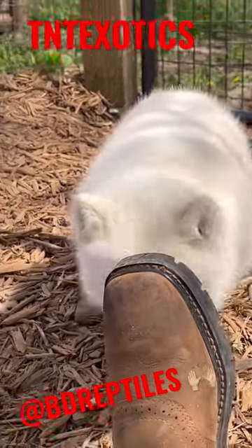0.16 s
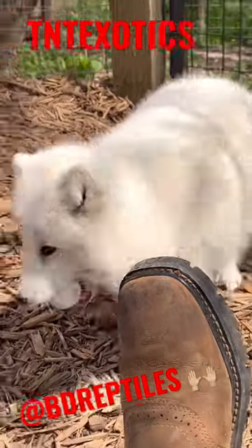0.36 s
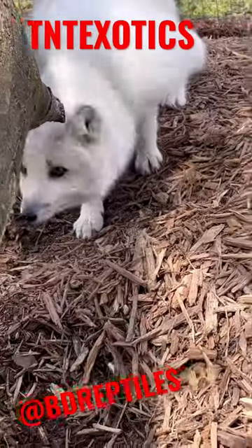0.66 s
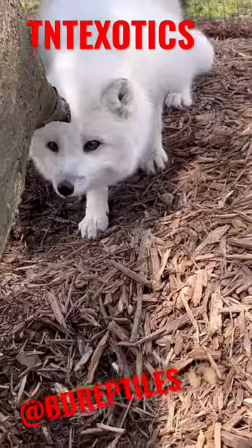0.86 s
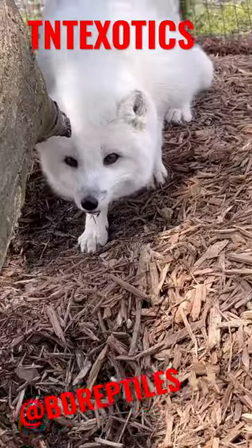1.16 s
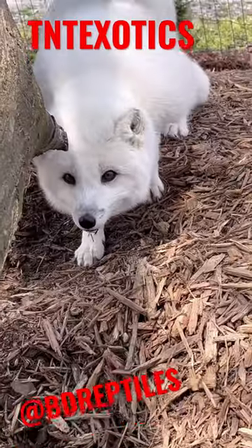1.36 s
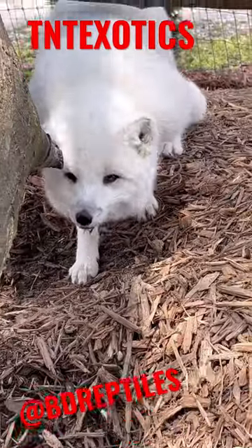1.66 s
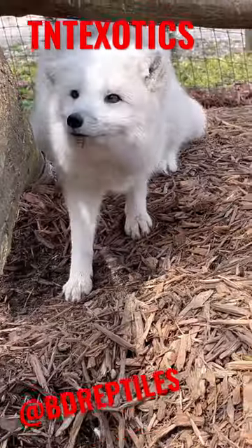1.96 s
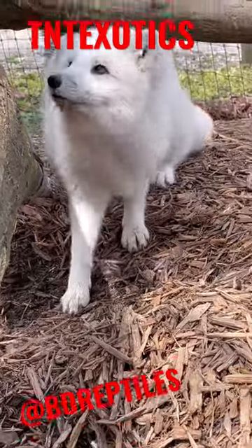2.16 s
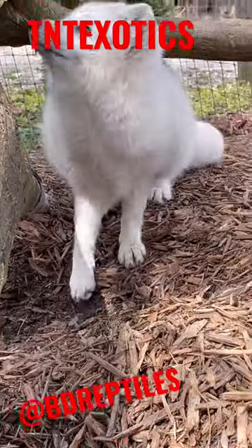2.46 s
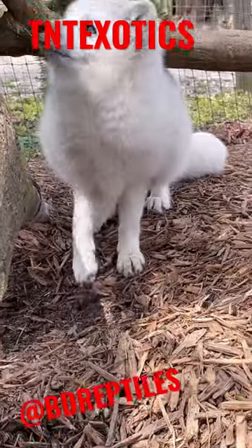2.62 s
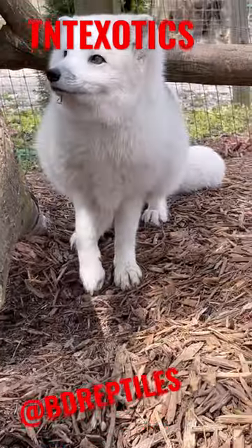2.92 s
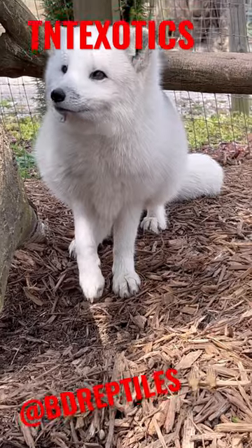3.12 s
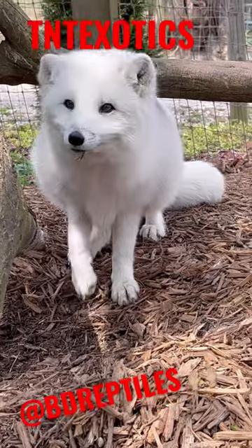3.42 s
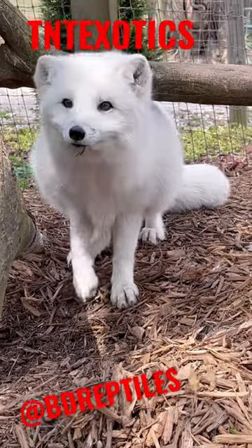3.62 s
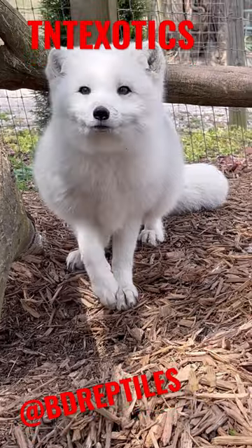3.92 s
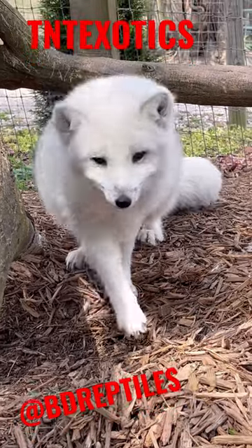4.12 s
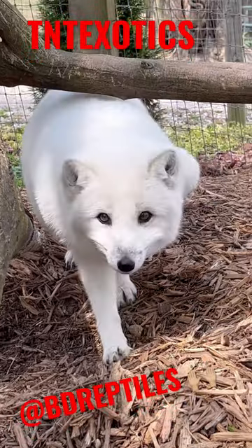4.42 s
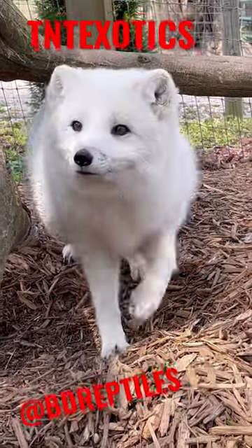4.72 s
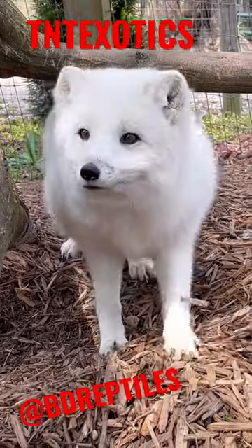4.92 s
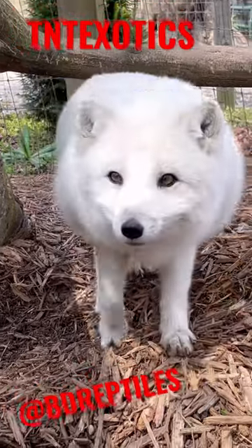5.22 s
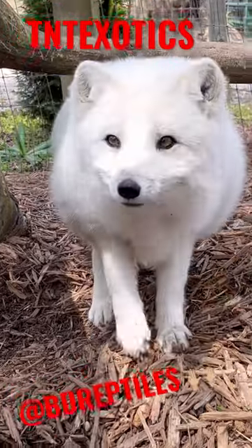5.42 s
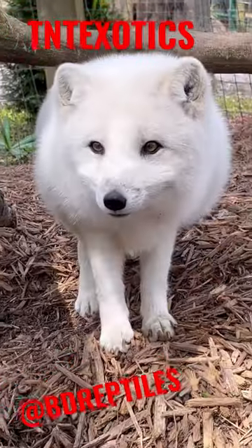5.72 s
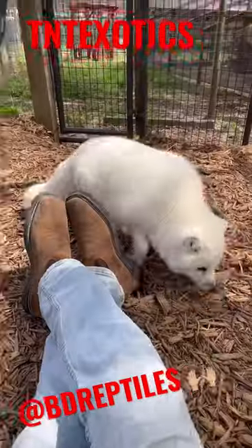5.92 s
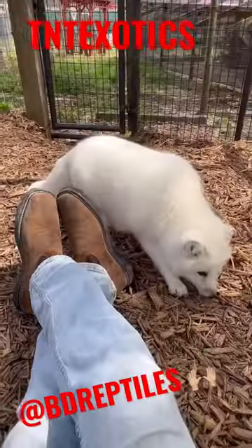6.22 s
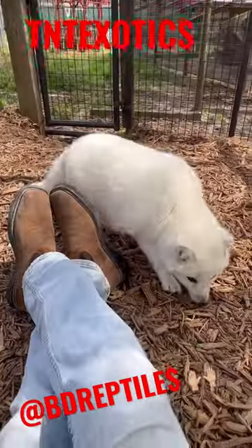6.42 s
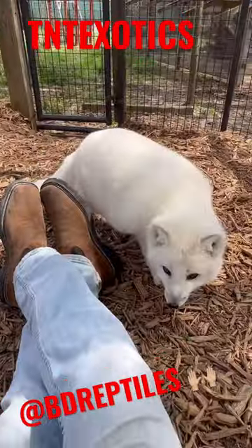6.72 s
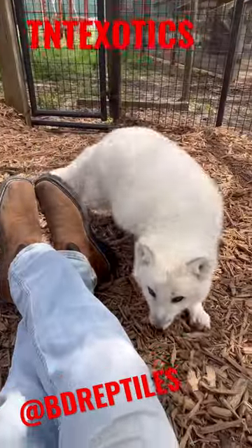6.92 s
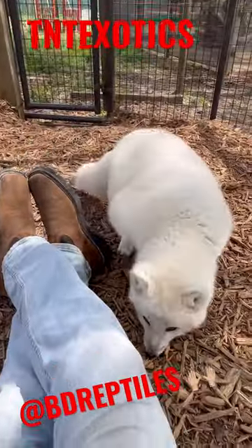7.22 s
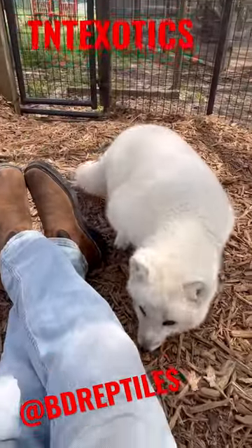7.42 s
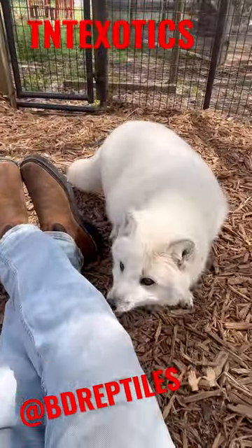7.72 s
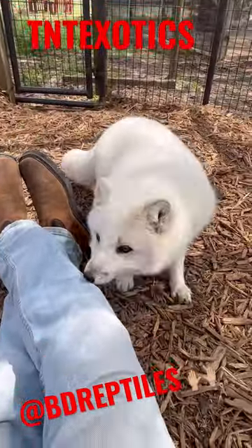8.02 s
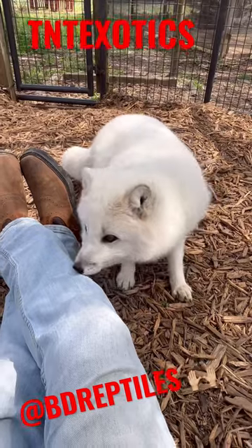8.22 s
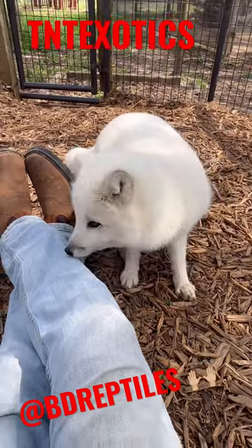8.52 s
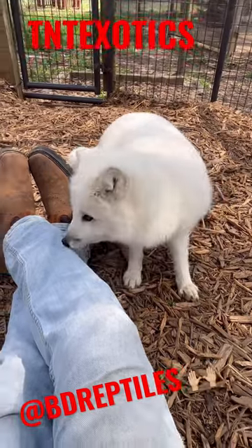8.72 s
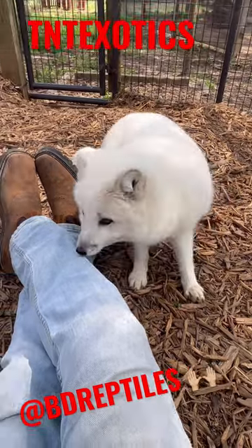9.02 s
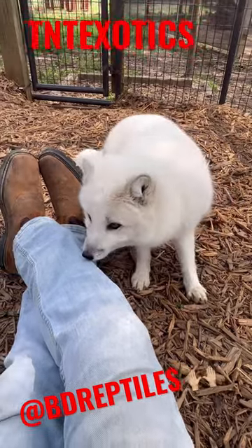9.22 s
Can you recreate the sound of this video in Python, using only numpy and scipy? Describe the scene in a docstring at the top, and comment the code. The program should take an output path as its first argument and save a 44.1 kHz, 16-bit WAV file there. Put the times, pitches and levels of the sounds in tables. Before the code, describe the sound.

A small plane hums very low beneath busy birdsong: zigzag sparrow chirps, clear whistles, quick chattering, thin high notes and a buzzing trill. Wind puffs thump the handheld microphone, and light crisp rustles come from paws on chips. After a sudden join at about six seconds, a fuller droning roar takes over, swelling unevenly to the end, with only occasional bird notes above it.

```python
"""An outdoor animal pen strewn with wood chips, in three joined passages: a small propeller plane drones closer.
The plane is a harmonic series of blade tones, joined in the last passage by an exhaust tone and chopped roar.
Sparrows, whistlers and high thin callers are gliding near-sines; a blackbird trills as a pulsed, resonant buzz.
All birds scatter among trees and fences. Shaped noise makes far traffic and leaves, wind on the microphone,
hiss and paws on chips; damped modes ring as a few hollow clicks, and a tick marks each join."""
import sys
import numpy as np
from scipy import signal
from scipy.fft import rfft, irfft, next_fast_len
from scipy.io import wavfile
from scipy.ndimage import uniform_filter1d

SR = 44100
rng = np.random.default_rng(int(sys.argv[2]) if len(sys.argv) > 2 else 0)


def to_wav(s):
    """Save 16-bit WAV."""
    ch = np.atleast_2d(s).T  # columns
    pcm = np.round(np.clip(ch, -1, 1) * 32767)  # PCM
    wavfile.write(sys.argv[1], SR, pcm.astype(np.int16))


N = 412776

# the three joined passages: start_s, end_s
PASSAGES = [(0, .553), (.553, 5.864), (5.864, 9.36)]
# when one sparrow repeats its zigzag chirp: start_s, level_db (before the group's trim), pitch_ratio
CHIRPS = [(0.637, -55.5, 1.01), (1.235, -51.5, 1.02), (2.16, -51.5, 1.02), (3.287, -55, 1.03)]
TREBLE_FROM_HZ, TREBLE_TO_HZ = 5600, 14300   # filter edges shared by the hissy sounds


def amp(db):
    """Decibels to amplitude ratio: 20 dB is a factor of ten."""
    return 10 ** (np.asarray(db) / 20)


def rms_one(x):
    """Normalise the mean power, so that rms is 1."""
    return x / np.sqrt(np.mean(x ** 2) + 1e-20)


def in_time(rows):
    """Linear interpolation: the columns of a curve table at every sample."""
    s, *columns = np.transpose(rows)
    return np.array([np.interp(np.arange(N) / SR, s, c) for c in columns])


def sounding(rows, fade):
    """Gating: 1 from the first row's time to the last, with linear edges of fade seconds."""
    t = np.arange(N) / SR
    return np.clip(np.minimum(t - rows[0][0], rows[-1][0] - t) / fade, 0, 1)


def by_passage(tables):
    """Piecewise interpolation: curves that may jump where two passages join."""
    t = np.arange(N) / SR
    return sum(in_time(rows) * ((t >= a) & (t < b)) for rows, (a, b) in zip(tables, PASSAGES))


def at_hz(points, hz):
    """Read a spectrum table on a logarithmic frequency axis."""
    p = np.array(points)
    return np.interp(np.log(hz), np.log(p[:, 0]), p[:, 1])


def drift(rate):
    """Low-passed noise: a random wander of rms 1, slower than about rate in Hz."""
    # computed at one sixteenth of the sample rate, past the filter's settling
    r = np.exp(-32 * np.pi * rate / SR)
    white = rng.standard_normal(N // 16 + 4002)
    slow = rms_one(signal.lfilter([1], [1, -2 * r, r * r], white)[4000:])
    return np.interp(np.arange(N) / 16, np.arange(len(slow)), slow)


def resonate(x, hz, width):
    """Two-pole resonance: bandwidth sets the damping; gain is about 1 on top."""
    r = np.exp(-np.pi * width / SR)
    zeros = np.array([1, 0, -1]) * (1 - r * r) / 2
    return signal.lfilter(zeros, [1, -2 * r * np.cos(2 * np.pi * hz / SR), r * r], x)


def steep(x, hz, kind):
    """Elliptic filtering: a steep low- or high-pass."""
    return signal.sosfilt(signal.ellip(8, 1, 45, hz, kind, fs=SR, output="sos"), x)


def impulses(events):
    """Unit-sample excitation: one sample at each event, of its peak height."""
    x = np.full(N, 1e-18)
    for s, db in events:
        x[round(s * SR)] = amp(db)
    return x


def banded_noise(colour, patchy_db, above_hz=0, lift_db=0):
    """Partly coherent stereo noise in third-octaves; bands centred over above_hz also follow lift_db."""
    # left-right likeness: frequency_hz, correlation
    likeness = [(40, 0.99), (110, 0.96), (210, 1), (390, 0.85), (740, 0.36), (1380, 0.53), (2580, 0.39),
                (4820, 0.91), (6000, 1), (9000, 0.8)]
    # the ports differ in colour: frequency_hz, left_minus_right_db
    lean = [(60, 0), (98, 2), (160, -3), (260, 1.5), (420, 1), (690, -4), (1120, -0.5), (1820, 4.5),
            (2960, 0), (4820, 0)]
    edges = colour[0][0] * 2 ** np.arange(0, np.log2(colour[-1][0] / colour[0][0]) + .01, 1 / 3)
    out, power, white = 0, 0, rng.standard_normal((2, 2, N))
    for k, (low, high) in enumerate(zip(edges, edges[1:])):
        band = signal.butter(3, [low, high], "band", fs=SR, output="sos")
        mid, side = signal.sosfilt(band, white[k % 2])   # neighbouring bands are independent
        hz = np.sqrt(low * high)
        alike = np.clip(at_hz(likeness, hz), -1, 1)
        level_db = at_hz(colour, hz)
        gain = amp(level_db + patchy_db * drift(10.0) + lift_db * (hz > above_hz))
        gain = gain * amp(at_hz(lean, hz) * np.array([[.5], [-.5]]))
        power += amp(2 * level_db) * (high - low) / SR * 2
        stereo = np.sqrt(1 + alike) * mid + np.sqrt(1 - alike) * side * [[1], [-1]]
        out = out + gain * stereo / np.sqrt(2)
    return out / np.sqrt(power)


def notes(tables, rough, overtones_db=(), flutter_db=2):
    """Frequency modulation: near-sine notes whose pitch and level are shaken fast at random."""
    out, shake, flutter = np.zeros(N), drift(200), drift(65)
    for rows in tables:
        s, hz, db = np.transpose(rows)
        span = np.arange(int(s[0] * SR), min(int(s[-1] * SR), N))
        t = span / SR
        pitch_hz = np.interp(t, s, hz) * (1 + rough * shake[span])
        phase = 2 * np.pi * np.cumsum(pitch_hz) / SR
        wave = np.sin(phase) + sum(amp(o) * np.sin(k * phase) for k, o in enumerate(overtones_db, start=2))
        edges = np.clip(np.minimum(t - s[0], s[-1] - t) / .006, 0, 1)
        out[span] += np.sqrt(2) * wave * amp(np.interp(t, s, db) + flutter_db * flutter[span]) * edges
    return out


def shaped(events):
    """Envelope shaping: each note swells, holds and dies away while its pitch turns once."""
    onset, turn, release = .24, .4, .26   # shares of the note's length
    shares = np.sort([0, onset, turn, 1 - release, 1])
    envelope_db = np.interp(shares, [0, onset, 1 - release, 1], [-2, 0, .5, -10.5])
    curves = []
    for s, length, *hz, db in events:
        pitch_hz = np.interp(shares, [0, turn, 1], hz)
        curves.append(np.transpose([s + length * shares, pitch_hz, db + envelope_db]))
    return curves


def pips(events, parts):
    """Windowed chirps: each event sounds the same few brief glides, swelling and fading smoothly."""
    out = np.zeros(N)
    for delay, from_hz, to_hz, length, part_db in parts:
        size = int(length * SR)
        phase = 2 * np.pi * np.cumsum(np.linspace(from_hz, to_hz, size)) / SR
        glide = np.hanning(size) * np.sin(phase)
        for s, db in events:
            start = round((s + delay) * SR)
            out[start:start + size] += amp(db + part_db) * glide
    return out


def throat(x, group):
    """Formant filtering: parallel resonances, each applied twice for steep flanks; rms 1."""
    return rms_one(sum(amp(db) * resonate(resonate(x, hz, w), hz, w) / np.sqrt(w) for hz, w, db in group))


def among_trees(x, wet_db, t60):
    """Diffuse scattering from trunks and fences: decaying, partly coherent noise, ending with the passage."""
    t = np.arange(int(t60 * SR)) / SR
    mid, side = rng.standard_normal((2, len(t))) * amp(-60 * t / t60) * np.minimum(t / .01, 1)
    alike = .75   # left-right correlation
    scatter = np.sqrt(1 + alike) * mid + np.sqrt(1 - alike) * side * [[1], [-1]]
    scatter /= np.sqrt(np.sum(scatter ** 2, axis=1, keepdims=True))
    out = np.array([x, x])
    for a, b in PASSAGES:
        part = slice(round(a * SR), round(b * SR))
        wet = signal.fftconvolve(x[None, part], scatter, axes=1)[:, :len(x[part])]
        out[:, part] += amp(wet_db) * wet
    return out


def microphone_hiss():
    """Self-noise: faint white noise confined to the treble."""
    treble = steep(rng.standard_normal(N), TREBLE_FROM_HZ, "high")
    return amp(-91) * steep(treble, TREBLE_TO_HZ, "low")


def far_air():
    """Superposed distant sources: far traffic and leaves as coloured noise; its airy treble rises and falls."""
    # one table a passage: time_s, level_db (before the trim below)
    air_levels = [
        [(0.0, -57), (0.354, -56), (0.553, -55.5)],
        [(0.55, -56), (0.88, -56.5), (1.29, -58.5), (1.78, -56), (2.0, -57.5), (4.01, -55), (4.95, -55.5),
         (5.73, -53), (5.86, -53.5)],
        [(5.86, -47.5), (6.06, -47.5), (6.3, -51), (6.99, -52.5), (7.71, -56), (8.06, -62.5), (9.36, -51.5)],
    ]
    # frequency_hz, density_db_per_hz
    air_colour = [(200, -8), (320, -10.5), (620, -13.5), (1200, -16.5), (1840, -24.5), (2590, -29.5),
                  (3590, -28.5), (4470, -36), (5450, -34), (6000, -50), (6500, -46), (8100, -60)]
    # level of the treble against the colour: time_s, lift_db
    air_treble = [(0, 12), (.55, 0.5), (.9, 1.5), (1.45, 5), (1.6, -4.5), (1.9, 1.5), (2.35, 2.5),
                  (2.6, -6.5), (2.9, -8.5), (3.2, 3.5), (3.9, 1.5), (4.3, 0), (4.55, -14.5), (4.8, 8),
                  (5.86, 1), (9.36, -6.5)]
    air = banded_noise(air_colour, patchy_db=2.0, above_hz=2400, lift_db=in_time(air_treble)[0])
    return amp(by_passage(air_levels)[0] - 1.5) * air


def join_ticks():
    """Step response: a small jump in the waveform, dying at once, where two passages meet."""
    # time_s, peak_db (before the trim below)
    ticks = [(0.554, -33.5), (5.8642, -38)]
    return amp(2.5) * signal.lfilter([1], [1, -.92], impulses(ticks))


def wind():
    """Turbulent pressure on the microphone ports: rumble and puffs, a wandering calm that gusts lift."""
    # frequency_hz, density_db_per_hz
    wind_colour = [(25, -18), (50, 6), (68, 6.5), (105, -3.5), (130, -1.5), (190, -12.5), (240, -17.5),
                   (320, -30.5)]
    # wind between gusts, one row a passage: rumble_db, puff_db (before the trims below)
    calm_levels = [(-51.5, -53), (-55.5, -55.5), (-53.5, -49)]
    # centre_s, db_over_calm
    gusts = [(.02, -1), (.3, 2), (.47, 0.5), (1.06, 11.5), (1.95, 12), (2.23, 10.5), (2.5, 3), (2.7, 4.5),
             (2.97, 4.5), (3.41, 7), (3.75, 2.5), (4.1, 5), (5.88, 6), (6.39, -1.5), (6.9, -1.5), (7.09, 2),
             (8.81, 3), (9.12, 7.5)]
    gust_s, puff_share, wander_db = .29, .62, 1   # full length of a gust; share of it in the puffs
    t = np.arange(N) / SR
    gust_db = sum(db * np.cos(np.pi * np.clip((t - s) / gust_s, -.5, .5)) ** 2 for s, db in gusts)
    rumble_db, puff_db = by_passage([[(a, *calm), (b, *calm)] for calm, (a, b) in zip(calm_levels, PASSAGES)])
    rumble_db = rumble_db + gust_db + wander_db * drift(1.5)
    puff_db = puff_db + puff_share * gust_db + wander_db * drift(5.0)
    noise = banded_noise(wind_colour, patchy_db=1, above_hz=75, lift_db=puff_db - rumble_db + 4.5)
    return amp(rumble_db + 6.0) * noise


def rustle():
    """Granular friction: paws free short showers of bright grains over faint, duller rustling that comes and goes."""
    # paws on chips: start_s, length_s, level_db
    showers = [(0.198, 0.076, -75), (.3, .1, -77), (0.406, 0.1, -79), (4.172, 0.022, -76),
               (4.52, 0.027, -75), (4.614, 0.086, -69.5), (4.804, 0.11, -68), (5.1, 0.067, -72),
               (5.417, 0.087, -70), (5.495, 0.045, -72.5), (5.71, .06, -70), (6.067, 0.091, -64),
               (6.363, 0.0083, -69), (6.367, .012, -61), (6.38, 0.026, -67), (6.594, 0.054, -72.5),
               (6.877, 0.057, -67.5), (7.19, 0.049, -62), (7.79, 0.048, -68.5)]
    # frequency_hz, width_hz, gain_db
    rustle_colour = [(6900, 7900, -1.5), (11400, 15000, 2.5), (15000, 3700, -5.5)]
    # faint, duller rustling: time_s, level_db (before the trim below)
    scuffle = [(0.0, -101), (0.78, -86), (1.01, -100), (2.03, -102), (2.32, -96.5), (2.74, -101),
               (4.51, -101), (4.77, -96), (5.01, -92), (5.66, -92.5), (5.94, -101), (6.31, -90.5),
               (6.88, -100), (7.06, -91.5), (7.59, -99), (7.66, -93), (8.34, -101), (9.36, -101)]
    t = np.arange(N) / SR
    corners = np.array([0, .12, .5, 1])   # start, end of attack, end of hold, end: shares of the length
    shower = sum(amp(db) * np.interp(t, s + length * corners, [0, 1, 1, 0]) for s, length, db in showers)
    grains = rng.standard_normal(N) * (rng.random(N) < .15)   # sparse
    grains = grains + .5 * rng.standard_normal(N)   # dense, alike in both channels
    grains = grains + .19 * rng.standard_normal((2, N))   # each channel's own
    grains = sum(amp(db) * resonate(grains, hz, width) for hz, width, db in rustle_colour)
    grains = rms_one(steep(grains, TREBLE_FROM_HZ, "high"))
    scuffle_gain = amp(in_time(scuffle)[0] + 9.5 + 4.0 * drift(7))
    return shower * grains + scuffle_gain * steep(grains, TREBLE_TO_HZ, "low")


def clicks():
    """Modal synthesis: a brief contact sets the damped modes of a small hollow body ringing."""
    # contacts: time_s, peak_db (before the modes' gains)
    contacts = [(5.0518, -31.5), (5.0695, -41), (5.0752, -40), (5.0768, -27), (5.7475, -36.5)]
    # frequency_hz, gain_db, t60_s
    modes = [(1610, -7, 0.008), (1280, 8, 0.0037), (920, -7, 0.0045), (564, -4, 0.033)]
    touch = np.hanning(int(.0006 * SR))   # contact lasts 0.6 ms
    taps, out = np.convolve(impulses(contacts), touch / touch.sum())[:N], 0
    for hz, db, t60 in modes:
        r, w = amp(-60 / (t60 * SR)), 2 * np.pi * hz / SR
        out = out + amp(db) * signal.lfilter([0, np.sin(w)], [1, -2 * r * np.cos(w), r * r], taps)
    return out * amp([[-1.5], [1.5]])   # louder on the right


def blackbird():
    """Amplitude modulation: a throbbing buzz of about 100 pulses a second excites two groups of resonances."""
    # start_s, length_s, low_band_db, high_band_db, high_band_loss_db_per_s
    trills = [(0, 0.18, -54.5, -56.5, 36), (4.87, 0.71, -57.5, -89, 18), (5.86, 0.34, -55, -55, 54.5)]
    # throat resonances of the low band, one table a trill: frequency_hz, width_hz, gain_db
    low_groups = [
        [(2890, 230, 2), (3220, 350, -1.5), (3930, 500, -6.5), (4520, 530, -8)],
        [(2975, 250, 7), (3430, 340, 2.5), (4050, 680, -1.5), (4930, 380, -3.5)],
        [(2856, 140, 2.5), (3340, 170, 7.5), (3750, 400, -8)],
    ]
    # throat resonances of the high band: frequency_hz, width_hz, gain_db
    high_group = [(5280, 280, 0), (4800, 400, -9)]
    t = np.arange(N) / SR
    pulses = 1 + .95 * np.sin(2 * np.pi * 100 * t + 2.1 * drift(1.44))
    throb = 1 + .13 * np.sin(2 * np.pi * 32 * t)
    buzz, out = pulses * throb * rng.standard_normal(N), 0
    high = throat(buzz, high_group)
    for (s, length, low_db, high_db, loss_db), group in zip(trills, low_groups):
        release_db = -23 * np.clip((t - s - length) / .036 + 1, 0, 1)   # over the last 36 ms
        high_gain = amp(high_db - loss_db * np.clip(t - s, 0, length))
        both = amp(low_db) * throat(buzz, group) + high_gain * high
        out = out + sounding([[s], [s + length]], .0049) * amp(release_db) * both
    return steep(out, 6600, "low")


def far_birds():
    """Frequency-modulated tones: far calls, hoarse calls, chirps that fall twice, and high thin notes."""
    # three tables of notes: start_s, length_s, pitch_start_hz, pitch_turn_hz, pitch_end_hz,
    # level_db (before the group's trim)
    far_calls = [(.65, 0.49, 2160, 2140, 2036, -72), (1.87, 0.075, 5270, 4840, 5100, -70),
                 (2.085, 0.094, 2480, 3540, 4030, -65), (3.39, 0.11, 5600, 5040, 5200, -78),
                 (7.55, 0.2, 5800, 5540, 5650, -71.5), (7.97, 0.11, 5140, 5200, 5050, -70)]
    hoarse_calls = [(1.81, 0.065, 2940, 3500, 4140, -64.5), (2.99, 0.068, 4370, 4630, 4680, -67.5),
                    (3.02, 0.082, 3740, 3720, 3430, -62.5), (6.495, 0.25, 6250, 5260, 4880, -62.5),
                    (6.52, 0.093, 4500, 4230, 4250, -70), (6.7, .2, 4750, 5033, 4650, -75)]
    thin_notes = [(.36, .19, 6930, 7000, 6720, -84.5), (1.145, 0.12, 6670, 6830, 6850, -73),
                  (1.34, 0.045, 8050, 7730, 7700, -79), (1.68, 0.16, 7840, 7800, 7900, -82),
                  (1.89, 0.021, 6694, 6806, 6700, -75), (2.42, 0.32, 7700, 7840, 7880, -83),
                  (2.8, 0.33, 7200, 6800, 6700, -93), (3.4, 0.16, 7430, 7980, 7550, -85),
                  (4.16, 0.33, 8480, 7800, 7980, -81), (4.4, 0.077, 8260, 8470, 8100, -74.5),
                  (4.98, 0.13, 8100, 8800, 9140, -76.5), (5.33, 0.041, 8260, 8200, 8160, -84),
                  (5.585, 0.042, 8400, 8260, 7900, -76), (5.65, 0.15, 8150, 8660, 8400, -76),
                  (5.75, 0.25, 6920, 6650, 6380, -72), (6.0, 0.066, 6300, 7100, 6946, -71),
                  (6.27, 0.21, 6650, 6520, 6720, -72), (6.725, 0.061, 6900, 7100, 6900, -77),
                  (6.86, 0.38, 6200, 6150, 6320, -69.5), (7.48, .15, 6770, 6280, 6086, -70.5),
                  (7.63, 0.77, 6220, 6540, 6200, -77.5), (8.35, 0.47, 6170, 6320, 6700, -76.5)]
    # high note that opens each zigzag chirp: offset_s, length_s, pitch_start_hz, pitch_turn_hz,
    # pitch_end_hz, db_against_chirp
    opening = (-.04, .045, 4300, 4800, 5250, -19)
    # another sparrow's chirp falls twice: offset_s, pitch_hz, relative_db
    fall_shape = [(-.008, 4350, -12), (.006, 4400, -2), (.02, 4150, -4), (.044, 3200, 0), (.052, 3250, -16),
                  (.068, 3500, -10), (.076, 3450, -1), (.096, 2850, 0), (.106, 2800, -14)]
    # when it is sung: start_s, level_db (before the group's trim)
    fall_times = [(3.636, -60.5), (5.636, -58.5)]
    openings = [(s + opening[0], *opening[1:-1], db + opening[-1]) for s, db, _ in CHIRPS]
    falls = [[(s + after, hz, db + shape_db) for after, hz, shape_db in fall_shape] for s, db in fall_times]
    out = notes(shaped(far_calls + openings), rough=.045, flutter_db=4)
    out += notes(shaped(hoarse_calls), rough=.048)
    out += notes(falls, rough=.026, flutter_db=4)
    return out + notes(shaped(thin_notes), rough=.017, flutter_db=4)


def near_birds():
    """Gliding sines: whistles, a long burred whistle and chatter made of windowed glides."""
    # two tables of notes: start_s, length_s, pitch_start_hz, pitch_turn_hz, pitch_end_hz,
    # level_db (before the group's trim)
    whistles = [(.185, 0.086, 2470, 2495, 2500, -51.5), (1.12, 0.031, 2920, 3000, 2720, -61.5),
                (1.73, 0.1, 2700, 3000, 2830, -65.5), (2.71, 0.058, 2830, 2900, 2960, -68),
                (3.09, 0.11, 2480, 2550, 2490, -66.5), (3.14, 0.07, 5145, 5160, 5220, -70),
                (3.2, 0.065, 1905, 1892, 1900, -59), (3.87, 0.027, 1690, 1620, 1587, -62),
                (4.2, 0.047, 2760, 3000, 2650, -61.5), (4.47, 0.086, 1650, 1650, 1615, -66.5),
                (4.79, 0.044, 1880, 1910, 1910, -61.5), (4.827, 0.024, 2290, 2720, 2750, -49.5),
                (5.558, .085, 2520, 2490, 2460, -56.5), (5.65, 0.069, 2460, 2440, 2400, -63),
                (5.752, 0.14, 4870, 4750, 4680, -65), (8.085, 0.091, 5420, 5400, 5410, -68.5),
                (9.12, .036, 5500, 5530, 5480, -69.5), (9.175, 0.055, 5500, 5600, 5400, -67.5)]
    burred = [(3.355, 0.15, 2700, 2720, 2870, -61.5), (3.47, 0.38, 2910, 2886, 2840, -63)]
    # time_s, peak_db (before the group's trim)
    chatter_times = [(1.8865, -52), (1.9305, -52), (1.9734, -48.5), (2.0178, -49), (2.0611, -48),
                     (2.1134, -49), (2.168, -45.5), (3.9396, -50), (3.9789, -48.5), (4.0183, -47),
                     (4.0711, -49.5), (4.144, -47.5)]
    # delay_s, from_hz, to_hz, length_s, relative_db
    chatter_parts = [(-.0015, 2280, 2350, 0.0067, 0), (-.0083, 1700, 2400, 0.008, -9),
                     (-.021, 1750, 2050, 0.008, -6)]
    out = notes(shaped(whistles), rough=.012, flutter_db=1.5)
    out += pips(chatter_times, chatter_parts)
    return out + notes(shaped(burred), rough=.022, flutter_db=5)


def chirp_hiss(chirps):
    """Envelope following: bright resonant noise rises and falls with the loudness of the chirps."""
    # frequency_hz, width_hz, gain_db
    hiss_bands = [(6800, 3000, -4), (11500, 2800, -12.5)]
    breath = uniform_filter1d(np.abs(chirps), size=400) * rng.standard_normal(N)
    bright = sum(amp(db) * resonate(resonate(breath, hz, width), hz, width) for hz, width, db in hiss_bands)
    return steep(bright, TREBLE_FROM_HZ, "high")


def sparrows():
    """Frequency-modulated tones: a repeated zigzag chirp with a hissy top, and single notes with an overtone."""
    # zigzag chirp: offset_s, pitch_hz (before the pitch ratio), relative_db
    chirp_shape = [(-.035, 2600, -32), (-.008, 3700, -20), (.002, 4100, -5), (.016, 3950, -3),
                   (.029, 3300, -2), (.035, 3200, -26), (.043, 3250, -12), (.047, 3330, 0),
                   (.064, 3750, -3), (.074, 3000, 0), (.082, 3050, -22)]
    # start_s, length_s, pitch_start_hz, pitch_turn_hz, pitch_end_hz, level_db (before the group's trim)
    sparrow_notes = [(.985, .11, 3926, 4050, 3650, -68), (1.122, 0.036, 3624, 3620, 3600, -65),
                     (1.68, 0.063, 3940, 3890, 3760, -72), (2.632, 0.055, 4010, 3990, 2970, -66),
                     (2.69, 0.018, 3840, 3800, 3820, -70), (4.03, 0.055, 5000, 4730, 4440, -67),
                     (4.11, 0.057, 3900, 4050, 3499, -61.5), (4.345, 0.048, 3440, 3380, 3360, -71),
                     (4.42, 0.06, 3020, 2950, 2900, -70), (4.457, 0.017, 3960, 3810, 3594, -55.5),
                     (4.625, 0.016, 4000, 3400, 2800, -66), (4.671, 0.029, 2580, 2450, 2340, -50),
                     (4.72, 0.042, 3710, 3700, 3660, -65), (4.846, 0.023, 4080, 4150, 4080, -59.5),
                     (4.875, .02, 3940, 3500, 3000, -55), (5.8, 0.014, 3800, 3630, 3320, -57.5),
                     (8.518, 0.045, 3810, 3700, 3370, -59), (8.57, 0.042, 3420, 3300, 3070, -57),
                     (8.69, 0.041, 4000, 3980, 3950, -73)]
    chirps = [[(s + after, ratio * hz, db + shape_db) for after, hz, shape_db in chirp_shape]
              for s, db, ratio in CHIRPS]
    sung = notes(chirps, rough=.023, flutter_db=3.5)
    return sung + chirp_hiss(sung) + notes(shaped(sparrow_notes), rough=.032, overtones_db=(-32,))


def birds():
    """Direct and scattered sound: each group of birds has its own balance and decay time."""
    far = far_birds() + amp(-1) * blackbird()
    out = amp(-1) * among_trees(sparrows(), wet_db=-1.5, t60=.42)
    out += amp(-1.5) * among_trees(near_birds(), wet_db=-6, t60=.25)
    return out + amp(-1) * among_trees(far, wet_db=0, t60=.3)


def plane():
    """Harmonic blade tones waver in turbulent air; an exhaust tone and blade-chopped roar join them late."""
    # one table a passage: time_s, blade_rate_hz
    blade_rate = [
        [(0, 82.16), (.553, 83.83)],
        [(.553, 84.62), (3, 84.93), (5.864, 84.7)],
        [(5.864, 86.2), (6.6, 83.26), (7.6, 83.08), (8.3, 82.16), (9.36, 80.66)],
    ]
    # one table a passage: time_s, then level_db of multiples 1, 2, 3, 4
    propeller = [
        [(0, -43, -52.5, -51.5, -96), (.553, -57, -57.5, -84, -97)],
        [(.553, -41.5, -48.5, -69, -68), (1.1, -36, -48.5, -59.5, -66), (1.25, -43.5, -49.5, -57, -72),
         (1.75, -43.5, -46, -60.5, -70), (2.35, -36, -48, -64, -73), (2.85, -35, -55, -69, -77.5),
         (3.05, -38, -52, -73, -79), (4.0, -33, -54.5, -66, -76), (4.75, -33, -59.5, -56.5, -85.5),
         (5.2, -35, -62.5, -64, -73), (5.864, -32, -53.5, -59, -79)],
        [(5.864, -32, -52, -49, -75), (6.5, -32, -55, -49, -68), (6.9, -29.5, -57.5, -49.5, -63.5),
         (7.26, -32, -46.5, -48.5, -55.5), (7.65, -28.5, -46, -45.5, -51.5), (8.15, -34, -44, -43, -52),
         (8.6, -37, -49.5, -46, -54), (9.0, -33.5, -44.5, -45, -46), (9.36, -29, -40, -41, -48.5)],
    ]
    # multiple, db_against_fourth
    upper_orders = [(5, -3.5), (6, -9), (7, -34.5), (8, -21.5), (10, -14.5)]
    # time_s, pitch_hz, level_db
    exhaust = [(5.864, 134.5, -52), (6.7, 132.5, -50), (7.7, 130.5, -47), (9.36, 130, -49)]
    # roar as the plane nears: time_s, body_db, rasp_db (before the trims below)
    roar_levels = [(5.864, -40, -72), (6.25, -45.5, -71.5), (6.9, -47, -70), (7.33, -41.5, -62),
                   (7.5, -40.5, -64.5), (7.66, -38, -59), (7.72, -38.5, -62), (7.83, -37.5, -56.5),
                   (7.95, -41, -63), (8.45, -43, -66), (8.75, -44.5, -65), (8.9, -44, -62),
                   (9.07, -43.5, -58.5), (9.25, -47.5, -62.5), (9.36, -45, -58.5)]
    # frequency_hz, density_db_per_hz
    roar_colour = [(180, -43), (250, -3.5), (350, -9.5), (490, -5.5), (600, -19.5), (900, -11.5),
                   (1600, -27.5), (2260, -15), (2700, -22.5), (3350, -24.5), (4300, -32.5), (5270, -34.5),
                   (6850, -46.5), (8000, -75)]
    # narrow bands that stand out of the roar: frequency_hz, width_hz, added_db
    roar_peaks = [(820, 55, -9.5), (930, 67, -13), (2277, 50, 6.5), (2820, 290, -4), (4120, 480, -4.5)]
    blade_hz, levels = by_passage(blade_rate)[0], by_passage(propeller)
    phase = 2 * np.pi * np.cumsum(blade_hz) / SR
    orders = list(enumerate(levels, start=1)) + [(k, levels[-1] + db) for k, db in upper_orders]
    tones = 0
    for k, db in orders:
        fading_db = (k > 1) * 2 * drift(3.3)   # overtones fade in and out slowly
        waver_db = .4 * np.sqrt(k) * drift(14)
        tones = tones + amp(db + fading_db + waver_db) * np.sin(k * phase + .04 * k * drift(6))

    exhaust_hz, exhaust_db = in_time(exhaust)
    near = sounding(roar_levels, .001)
    exhaust_phase = 2 * np.pi * np.cumsum(exhaust_hz) / SR
    tones = tones + near * amp(exhaust_db + 1.5 * drift(3)) * np.sin(exhaust_phase)

    body_db, rasp_db = in_time(roar_levels)
    rasp_lift_db = rasp_db - body_db + 13.0 + 1.1 * drift(24)
    roar = banded_noise(roar_colour, patchy_db=2.0, above_hz=1700, lift_db=rasp_lift_db)
    # the rasp's narrow bands swell more than the rest and pulse with each blade
    blade_pulse = np.cos(phase + .67)
    swell = amp(.42 * (rasp_db - rasp_db[-SR:].mean())) * (1 + .53 * blade_pulse)
    peaks = sum(amp(db) * resonate(roar, hz, width) * (swell if 1700 < hz < 3300 else 1)
                for hz, width, db in roar_peaks)
    chop = 1 + .052 * blade_pulse
    return -np.sqrt(2) * tones + near * amp(body_db - 3.0) * chop * (roar + peaks)


def scene():
    """Superposition: the pressures of all sources add at the two microphone ports."""
    background = far_air() + microphone_hiss() + join_ticks() + wind()
    return background + rustle() + clicks() + birds() + plane()


def record(dry):
    """Interchannel phase: the ports differ by frequency, otherwise in the last passage; the top is cut."""
    # the first two passages, then the last: frequency_hz, left_lead_rad
    port_phase = [
        [(0, 0), (260, -0.1), (690, -1.0), (1120, 0.0), (1640, -0.3), (2580, 2.3), (3700, 0.8), (4480, 1.2),
         (5500, 1.9), (5850, 3.0), (6200, 3.4), (7600, 6.0), (8500, 6.5), (9600, 9.1), (10700, 9.7),
         (11900, 12.3), (13100, 12.9), (14200, 15.4), (16000, 16.5)],
        [(0, 0), (260, -0.1), (600, -1.3), (860, -0.4), (1120, -1.0), (1380, 0.4), (1640, -0.2), (2150, 4.2),
         (2410, 3.8), (2670, 4.8), (3450, 3.6), (4050, 5.8), (4800, 6.9), (5500, 7.4), (6000, 9.9),
         (6900, 10.8), (7600, 12.3), (8800, 12.8), (9600, 15.4), (10700, 16.0), (11900, 18.6), (13100, 19.2),
         (14200, 21.7), (16000, 22.8)],
    ]
    size = next_fast_len(N + 4096)
    hz, spectrum = np.arange(size // 2 + 1) * SR / size, rfft(dry, size)
    turned = []
    for lead in port_phase:
        lead_rad = np.interp(hz, *np.transpose(lead))
        half_each = np.exp(.5j * lead_rad * [[1], [-1]])   # left forward, right back
        turned.append(irfft(spectrum * half_each, size)[:, :N])
    early, late = turned
    ports = np.where(np.arange(N) < PASSAGES[-1][0] * SR, early, late)
    return signal.sosfilt(signal.ellip(10, .5, 70, 15550, fs=SR, output="sos"), ports)


dry = scene()
out = record(dry)
to_wav(out)
```